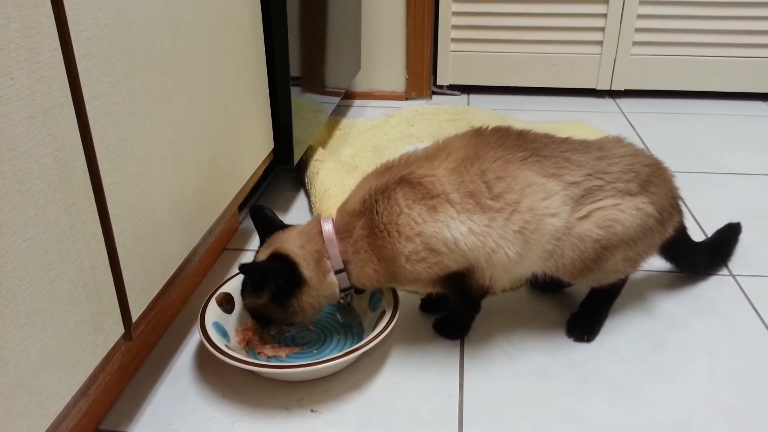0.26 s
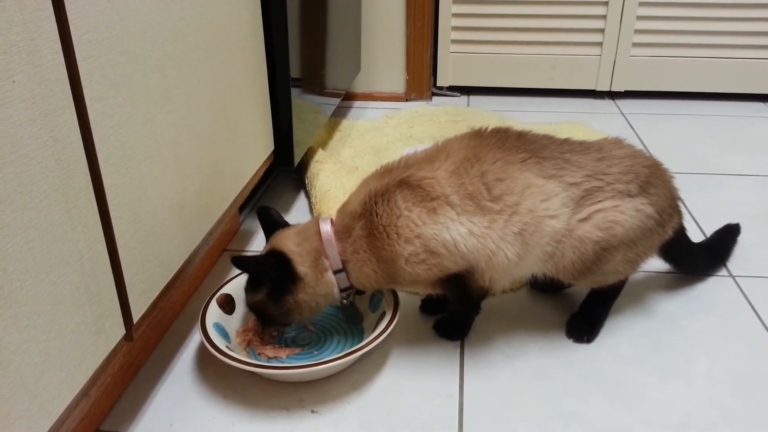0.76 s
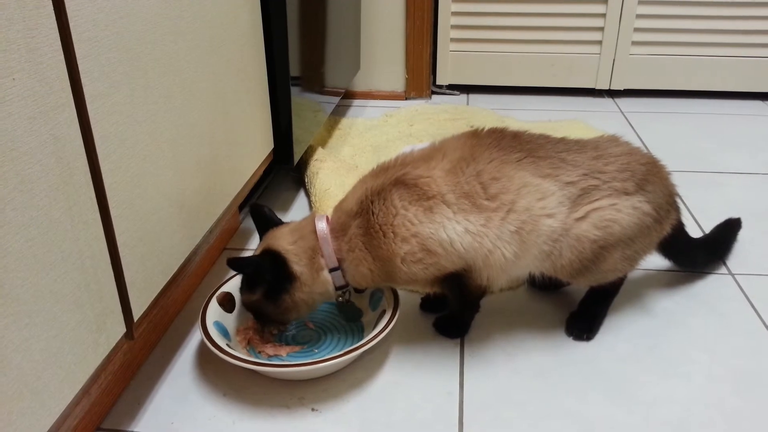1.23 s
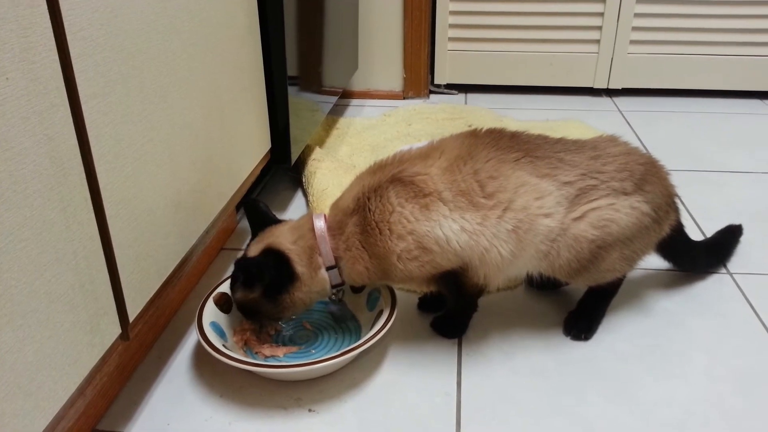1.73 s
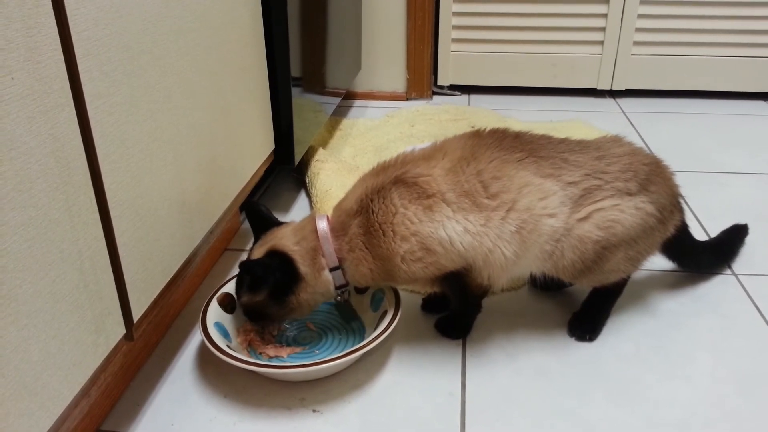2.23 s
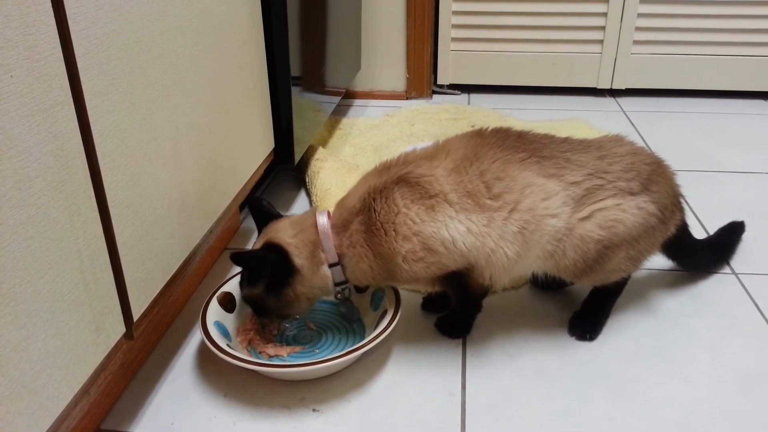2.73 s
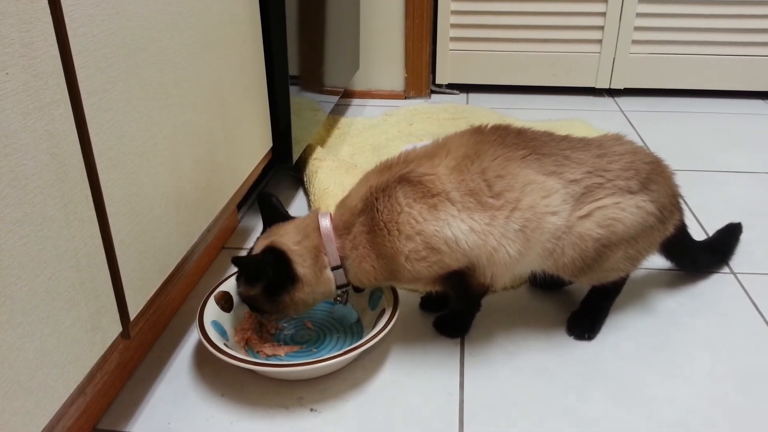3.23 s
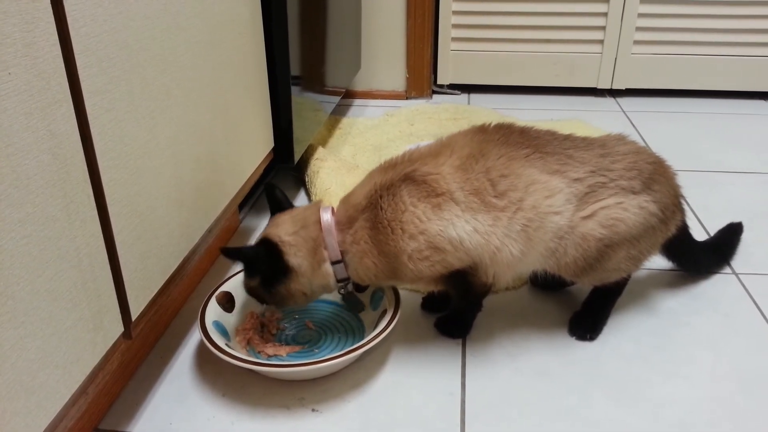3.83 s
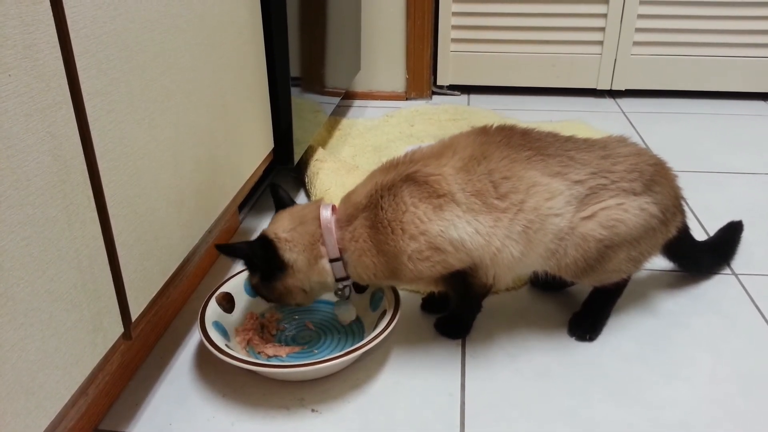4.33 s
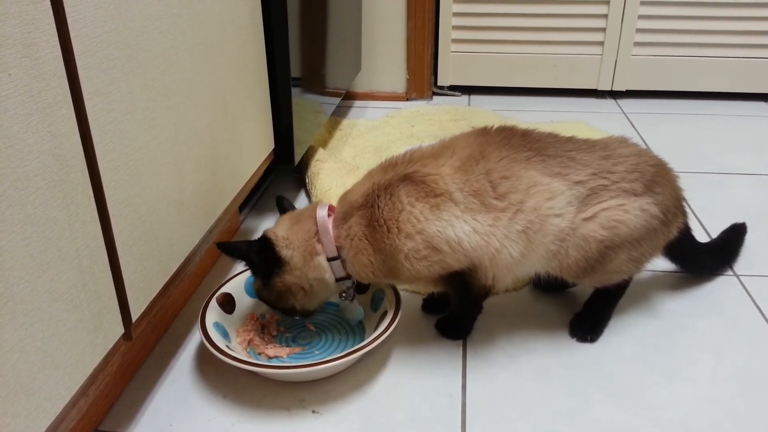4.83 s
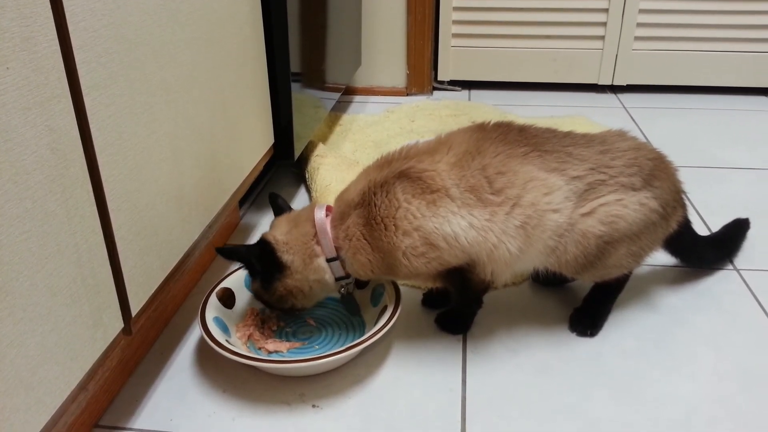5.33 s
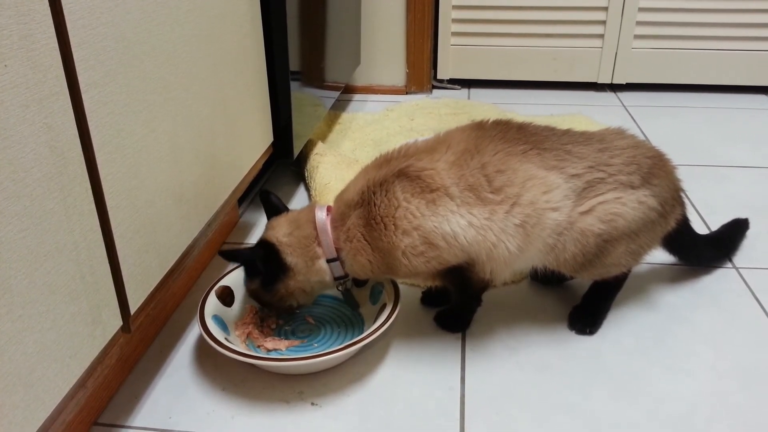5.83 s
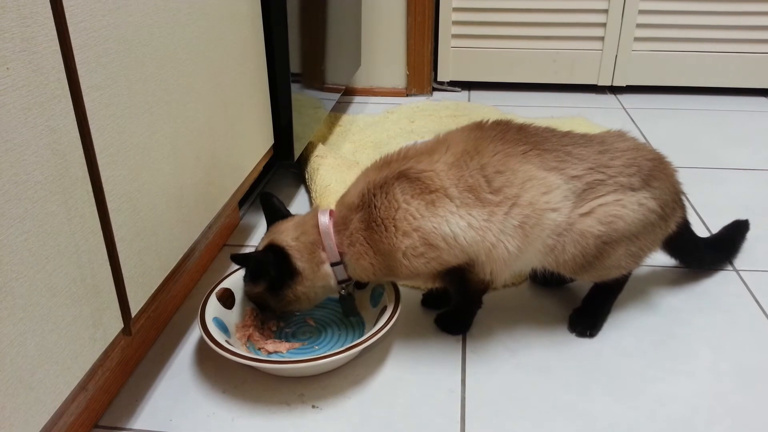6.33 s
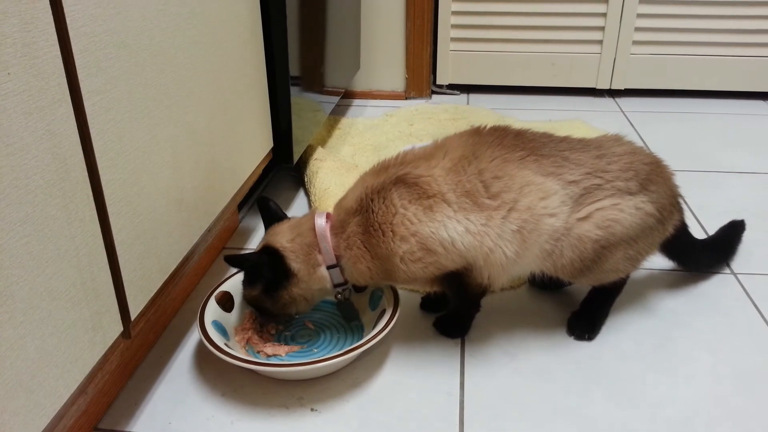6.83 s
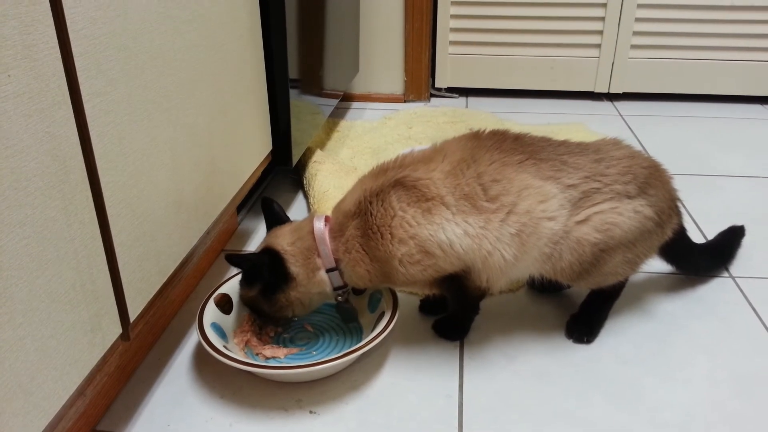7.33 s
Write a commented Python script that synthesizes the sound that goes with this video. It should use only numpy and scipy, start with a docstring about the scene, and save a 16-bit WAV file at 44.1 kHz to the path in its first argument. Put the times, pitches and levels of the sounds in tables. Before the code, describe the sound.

A cat eats wet food from a ceramic bowl on a tiled floor. Raspy licks come in quick runs, each shaking a tiny collar bell, with small wet smacks and clicks between. The metal tag now and then clinks on the rim. The busiest licking falls in the first half, then it thins to faint chewing. Close stereo microphone, small hard room, soft steady appliance hum.

```python
"""Cat eating, with a collar bell.

A cat eats wet food from a ceramic bowl on a tiled floor. Each lick jerks its head and swings a small collar
bell there and back; now and then the metal tag hits the rim. Bell, tag and bowl are sums of dying sine modes.
Tongue, wet smacks, fur and soft bumps are shaped noise; from midway, faint chewing keeps a steady beat.
Close walls add echoes and a diffuse tail, and an appliance hums as wavering sines over the room noise."""
import sys
import numpy as np
from scipy import signal
from scipy.fft import rfft, irfft
from scipy.io import wavfile

SR = 44100
rng = np.random.default_rng(int(sys.argv[2]) if len(sys.argv) > 2 else 0)


def to_wav(s):
    """Save 16-bit WAV."""
    ch = np.atleast_2d(s).T  # columns
    pcm = np.round(np.clip(ch, -1, 1) * 32767)  # PCM
    wavfile.write(sys.argv[1], SR, pcm.astype(np.int16))


N = 333396
EDGE_HZ = 14750  # upper limit of the whole sound


def gain_of(db):
    """Turns decibels into an amplitude factor."""
    return 10 ** (np.asarray(db) / 20)


def evened(x):
    """Scales x to an rms of 1."""
    return x / np.sqrt(np.mean(x ** 2) + 1e-20)


def read(points, hz):
    """Reads a table of (Hz, value) joined by lines on a log-frequency axis."""
    table_hz, value = np.transpose(points)
    return np.interp(np.log(hz + 1), np.log(table_hz), value)


def coloured(x, spectrum):
    """Filters x by a table of (Hz, dB)."""
    size = x.shape[-1]
    gain = gain_of(read(spectrum, np.fft.rfftfreq(size, 1 / SR)))
    return irfft(rfft(x) * gain, size)


def add(mix, start_s, sound):
    """Mixes a sound in at a given time, cut off at the end of the mix."""
    part = mix[max(round(start_s * SR), 0):][:len(sound)]
    part += sound[:len(part)]


def drift(rate_hz):
    """Slow random wander of rms 1: noise with nothing above rate_hz."""
    slow = np.fft.rfftfreq(N, 1 / SR) < rate_hz
    return evened(irfft(rfft(rng.standard_normal(N)) * slow, N))


# likeness of left and right in sound from all around: pitch_hz, correlation (-1..1)
LIKENESS = [(60, .94), (150, 0.99), (300, 0.71), (650, 0.51), (1300, -0.24), (3000, 0.19), (7000, 0.36)]


def diffuse(size):
    """Stereo noise from all around: nearly alike in the bass, only loosely related above."""
    left, other = rfft(rng.standard_normal((2, size)))
    same = np.clip(read(LIKENESS, np.fft.rfftfreq(size, 1 / SR)), -1, 1)
    right = same * left + np.sqrt(1 - same ** 2) * other
    return irfft(np.array([left, right]), size)


def ring(modes, tilt_db=0, detune=0, rise_s=0.00025):
    """Dying sine modes after one blow; a harder blow (higher tilt per octave) favours the high ones."""
    t = np.arange(SR // 2) / SR
    sound = np.zeros(len(t))
    for hz, db, t60 in modes:
        tilted_db = db + tilt_db * np.log2(hz / 4000)  # the tilt pivots at 4 kHz
        sound += gain_of(tilted_db - 60 * t / t60) * np.sin(2 * np.pi * hz * (1 + detune) * t)
    return sound * (1 - np.exp(-t / rise_s)) ** 2


def burst(spectrum, t60_s, rise_s=0.000088):
    """A short puff of coloured contact noise, dying by 60 dB in t60_s."""
    t = np.arange(SR // 2) / SR
    noise = evened(coloured(rng.standard_normal(len(t)), spectrum))
    return noise * gain_of(-60 * t / t60_s) * (1 - np.exp(-t / rise_s)) ** 2


# echoes off the cupboard and walls: left_s, right_s, level_db (before each source's echo_db)
ECHOES = [(.0021, 0.0023, -3), (.0137, 0.017, -4), (0.0156, .0155, 1.5), (.0225, .0212, -12.5),
          (0.0284, 0.015, -10.5)]
# time for the tail to fall by 60 dB: pitch_hz, t60_s
ROOM_T60 = [(150, 0.5), (1000, 0.29), (2500, 0.3), (6000, 0.23), (11000, 0.22), (15000, 0.091)]


def room(x, echo_db, tail_db, lag_s=.00009):
    """Direct sound (right ear first), a few wall echoes and a diffuse tail that dies soonest in the treble."""
    size = SR // 2
    hz, t, bands = signal.stft(diffuse(size), SR, nperseg=256)
    t60 = read(ROOM_T60, hz)[:, None]
    tail = signal.istft(bands * gain_of(-60 * t / t60), SR, nperseg=256)[1][:, :size]
    tail *= 1 - np.exp(-(np.arange(size) / SR / 0.0056) ** 2)  # the tail builds up over some milliseconds
    paths = gain_of(tail_db) * tail / np.linalg.norm(tail, axis=1, keepdims=True)
    direct = (0.0028, lag_s, 0.022)
    echoes = [(left, right, db + echo_db) for left, right, db in ECHOES]
    for left, right, db in [direct] + echoes:
        add(paths[0], left, gain_of([db]))
        add(paths[1], right, gain_of([db]))
    return signal.fftconvolve(x[None], paths, axes=1)[:, :N]


# colour of the swelling room noise: pitch_hz, relative level_db per Hz
RUMBLE = [(20, -28.5), (42, -18), (57, 0.5), (68, -1), (82, 1), (170, -2), (270, -6), (303, 3),
          (370, -18.5), (500, -2.5), (750, -12.5), (1300, -13.5), (2500, -24), (6000, -31)]
# colour of the even hiss: pitch_hz, relative level_db per Hz
HISS = [(500, -5), (2000, -4), (5000, -1), (11000, -3), (15000, -6)]


def background(rumble_db=-58.0, swell_db=2.9, hiss_db=-70):
    """Gently swelling room noise, nearly alike in both ears in the bass, under a thin even hiss."""
    rumble = evened(coloured(diffuse(N), RUMBLE))
    hiss = evened(coloured(rng.standard_normal((2, N)), HISS))
    return gain_of(rumble_db + swell_db * drift(rate_hz=18)) * rumble + gain_of(hiss_db) * hiss


# appliance hum: pitch_hz, mean level_db, phase between the ears_rad
HUM = [(115.3, -77, 0.5), (240.3, -73.5, -0.2), (302, -70.5, 0), (1124.4, -57.5, 3.5), (1190, -69.5, 3.5),
       (1288, -83, -2.5)]


def hum(waver_hz=1.31, flutter_db=3.0):
    """Motor tones: sines that waver slightly in pitch and level."""
    out = np.zeros((2, N))
    for hz, db, phase in HUM:
        angle = 2 * np.pi * np.cumsum(hz + waver_hz * drift(rate_hz=6)) / SR
        level = np.sqrt(2) * gain_of(db + flutter_db * drift(rate_hz=3.4))
        out += level * np.sin([angle, angle - phase])
    return out


# colour of rough wet contact: pitch_hz, relative level_db per Hz
RASP = [(100, -12), (600, 10), (1500, 3.5), (3000, -3.5), (5000, -2.5), (7000, -2), (10000, -8),
        (14000, -23)]


def licking(level_db=-4, grains_per_s=1500, spread_db=4.0):
    """The rough tongue drags through wet food: a dense crackle of random grains, swelling with each stroke."""
    sizes = gain_of(spread_db * np.minimum(rng.exponential(1, N), 4))
    present = rng.random(N) < grains_per_s / SR
    grains = sizes * rng.choice([-1, 1], N) * present
    crackle = evened(coloured(grains, RASP))
    return room(gain_of(level_db) * effort() * crackle, echo_db=-11.5, tail_db=3.0)


# licks that jerk the head: start_s, bell_db, time until the bell swings back_s
LICKS = [(0.756, -34, .053), (0.913, -25, .064), (1.053, -22.5, .057), (1.206, -26.5, .052),
         (1.353, -38, .047), (1.624, -26.5, .057), (1.746, -29.5, .062), (1.921, -36, .02),
         (2.325, -44, .02), (2.437, -43, .02), (2.596, -24.5, .061), (2.760, -16, .052), (2.898, -23, .054),
         (2.983, -29, .025), (3.110, -29, .028), (3.201, -27.5, .059), (3.952, -43.5, .061),
         (4.411, -24.5, .047), (6.042, -43.5, .086), (6.576, -48, .03), (6.763, -34.5, .031),
         (7.124, -49, .02), (7.483, -49.5, .02)]
STROKE_LEAD_S, STROKE_S = 0.0577, 0.24  # the tongue drags from just before the jerk until well after it
# crackle grows with the jerk (dB per dB of bell) and never quite stops
STROKE_DB, STROKE_GROWTH, IDLE_DB = -46, 0.58, -74.5


def effort():
    """Gain of the licking over time: one smooth swell for each stroke of the tongue."""
    power = np.full(N, gain_of(IDLE_DB) ** 2)
    swell = np.hanning(round(STROKE_S * SR))
    for s, db, _ in LICKS:
        stroke = gain_of(STROKE_DB + STROKE_GROWTH * db) * swell
        add(power, s - STROKE_LEAD_S, stroke ** 2)
    return np.sqrt(power)


# colour of the soft bumps: pitch_hz, relative level_db per Hz
BUMP = [(40, -14), (90, 1), (220, 5), (380, 1.5), (650, -2), (1200, -15.5), (3000, -24)]


def bumps(level_db=-67, per_s=7, spread_db=3, t60_s=0.1):
    """Soft low bumps, puffs of dull noise, come and go at random while the cat crouches and shifts."""
    out = np.zeros(N)
    for when, size in rng.random((round(per_s * N / SR), 2)):
        add(out, when * N / SR, gain_of(spread_db * size) * burst(BUMP, t60_s, rise_s=0.0052))
    return room(gain_of(level_db) * evened(out), echo_db=-12.5, tail_db=-4.5)


# the tag hits the rim: start_s, bowl_db, tag_db, hardness_db per octave
CLINKS = [(0.1025, -27, -29, -4), (0.3477, -37.5, -22.5, -3), (0.431, -48, -42.5, -5.5),
          (0.739, -34.5, -23.5, -5.5), (1.474, -37.5, -22.5, -2.5), (2.569, -31.5, -19.5, -5.5),
          (4.231, -17, -42, 0), (5.5182, -44, -60, -5), (5.868, -38.5, -36, -2), (6.2215, -36, -28.5, -6),
          (6.999, -41.5, -32, -8)]
# modes of the ceramic bowl: pitch_hz, relative level_db, t60_s
BOWL = [(1008, -25, .38), (2304, -10, .16), (2335, -22, .1), (4052, -4, .045), (4070, -6, .08),
        (6154, -3, .14), (6330, -6, .08), (7930, -16, .15), (8090, -22, .14), (8272, -8, .13),
        (8517, -8, .13), (9451, -9, .14), (10200, -17, .12), (10835, 2, .075), (11190, -20, .13),
        (12490, -26, .09)]
# modes of the metal tag: pitch_hz, relative level_db, t60_s
TAG = [(3964, -20, .07), (6457, -5, .07), (6515, -1, .055), (7560, -18, .12), (8637, -19, .1),
       (10200, -28, .07), (10390, -27, .07), (10863, -27, .05)]
# colour of the dull knock: pitch_hz, relative level_db per Hz
KNOCK = [(40, -14.5), (80, -4), (230, 2), (380, -2), (550, 1), (850, 3.5), (1500, -6.5), (3000, -10.5),
         (5000, -4), (7000, 4), (11000, -17.5), (12500, -22)]
KNOCK_DB, KNOCK_GROWTH = -21.5, 0.49  # the knock of a clink, and its dB per dB of ring


def clinks():
    """Bowl and tag ring together; the tag hangs under the chin, so its echoes outweigh its direct sound."""
    bowl, tag, knock = np.zeros((3, N))
    for s, bowl_db, tag_db, hardness_db in CLINKS:
        ring_db = 20 * np.log10(np.hypot(gain_of(bowl_db), gain_of(tag_db)))
        knock_gain = gain_of(KNOCK_DB + KNOCK_GROWTH * ring_db)
        tag_detune = 0.0005 * rng.standard_normal()
        add(bowl, s, gain_of(bowl_db) * ring(BOWL, hardness_db))
        add(tag, s, gain_of(tag_db) * ring(TAG, detune=tag_detune, rise_s=0.0015))
        add(knock, s, knock_gain * burst(KNOCK, t60_s=0.032, rise_s=0.00049))
    shaded_tag = room(tag, echo_db=4.5, tail_db=2)
    return room(bowl, echo_db=-10.0, tail_db=-5.5) + shaded_tag + room(knock, echo_db=-1, tail_db=4.5)


# modes of the bell shell: pitch_hz, relative level_db, t60_s (pitch and level vary at each strike)
BELL = [(5796, -15, 0.059), (5780, -5.5, 0.012), (5788, -1.5, 0.014), (6150, -17, 0.014),
        (10930, -22, 0.026), (13650, -23.5, 0.029), (13900, -25.5, .02)]


def bell(bounce_db=-8, bounce_gap_s=0.014, tick_db=-18, count=4):
    """The pellet strikes the slotted shell and bounces, ever softer; each spot rings the modes differently."""
    out = np.zeros(N)
    for s, db in jingles():
        gaps = rng.uniform(0.36, 1.8, count)
        spots = rng.standard_normal((count, len(BELL) + 1))
        times = s + bounce_gap_s * (np.cumsum(gaps) - gaps[0])
        for k, (detune, *shares) in enumerate(spots):
            modes = [(hz, level + 3.3 * share, t60) for (hz, level, t60), share in zip(BELL, shares)]
            tone = ring(modes, detune=0.0087 * detune, rise_s=0.00028)
            tick = gain_of(tick_db) * burst(RASP, t60_s=0.0047)
            add(out, times[k], gain_of(db + k * bounce_db) * (tone + tick))
    return room(out, echo_db=-8.0, tail_db=-4.0)


BACK_DB, BACK_GROWTH = 1.5, 0.1  # the back swing against the first strike: weaker after a gentle lick
JOLT_DB = -9  # a clink also jolts the bell, this far from the tag's level


def jingles():
    """Strikes of the bell as (start_s, level_db): there and back for each lick, once for each clink."""
    there = [(s, db) for s, db, swing in LICKS]
    back = [(s + swing, db + BACK_DB + BACK_GROWTH * db) for s, db, swing in LICKS]
    jolts = [(s, tag_db + JOLT_DB) for s, _, tag_db, _ in CLINKS]
    return there + back + jolts


# colour of the collar in the fur: pitch_hz, relative level_db per Hz
RUSTLE = [(45, -12), (100, 9), (500, 5), (1000, 2), (2000, 1.5), (4000, -3.5), (7000, 1), (10000, -1.5),
          (14000, -5.5)]


def rustle(level_db=-47, growth=0.46):
    """Each jerk that shakes the bell also drags the collar through the fur: a puff of noise."""
    out = np.zeros(N)
    for s, db in jingles():
        add(out, s, gain_of(level_db + growth * db) * burst(RUSTLE, t60_s=.3))
    return room(out, echo_db=-1.5, tail_db=1.5)


# the clear wet smacks: start_s, level_db, mouth resonance pitch_hz, width (share of the pitch), t60_s
SMACKS = [(0.599, -53, 4600, 0.44, .03), (0.722, -40.5, 2900, 0.29, 0.064),
          (2.135, -21, 6500, 0.18, 0.0033), (2.2214, -26, 7500, 0.48, 0.0038),
          (2.533, -48.5, 2450, 0.75, 0.28), (2.985, -26.5, 9900, 0.29, 0.0088),
          (3.24, -29, 9500, 0.48, 0.013), (3.388, -51, 1000, 0.17, 0.031), (3.457, -45, 1300, 0.38, 0.018),
          (3.482, -45.5, 1370, 0.4, 0.01), (3.615, -18, 9000, 0.52, 0.0033), (4.024, -35, 4200, 1.4, 0.024),
          (4.097, -35.5, 2970, 1.5, .016), (5.012, -46.5, 6000, 0.52, 0.037), (6.13, -41, 4500, 0.55, .015),
          (6.35, -36.5, 10000, 0.18, 0.013), (6.649, -32, 6550, 0.4, 0.0059),
          (6.717, -32.5, 5000, 0.069, 0.012), (7.385, -43, 7170, 0.38, 0.017)]


def smacks(spray_db=-30):
    """A film of saliva snaps, the mouth rings briefly with it, and a fine spray follows."""
    out = np.zeros(N)
    for s, db, hz, width, t60 in SMACKS + chews() + saliva():
        low_hz, high_hz = hz / (1 + width), min(hz * (1 + width), SR / 2 - 1)
        mouth = signal.butter(2, [low_hz, high_hz], "band", fs=SR, output="sos")
        narrow_boost = np.sqrt(EDGE_HZ / (high_hz - low_hz))  # makes up for what a narrow band loses
        pop = signal.sosfilt(mouth, burst(RASP, t60)) * narrow_boost
        spray = gain_of(spray_db) * burst(RASP, t60_s=0.091)
        add(out, s, gain_of(db) * (pop + spray))
    return room(out, echo_db=-14.0, tail_db=-6.5)


def saliva(level_db=-45, uneven_db=3, centre_hz=6500, octaves=.3, width=0.38, t60_s=.008):
    """A tiny bubble of saliva snaps at some moment of each tongue stroke, as rows like the smacks."""
    rows = []
    draws = rng.uniform(-1, 1, (len(LICKS), 3))
    for (s, _, _), (late, size, pitch) in zip(LICKS, draws):
        snap_s = s + STROKE_S / 2 * abs(late)
        rows.append((snap_s, level_db + uneven_db * size, centre_hz * 2 ** (octaves * pitch), width, t60_s))
    return rows


CHEW_FROM_S, CHEW_EVERY_S = 3.70, .331
CHEW_DB, CHEW_HZ, CHEW_WIDTH, CHEW_T60_S = -69, 3990, 0.28, 0.29  # mean level and mouth resonance of a bite


def chews():
    """One faint squelch for each bite, a little uneven in strength, as rows like the smacks."""
    times = np.arange(CHEW_FROM_S, N / SR, CHEW_EVERY_S)
    return [(s, CHEW_DB + 2 * rng.standard_normal(), CHEW_HZ, CHEW_WIDTH, CHEW_T60_S) for s in times]


def scene():
    """All layers together, in stereo."""
    return clinks() + bell() + rustle() + smacks() + licking() + bumps() + background() + hum()


# tone balance of left against right, shared half and half: pitch_hz, left minus right_db
BALANCE = [(100, 0), (300, .5), (600, 4), (1000, 4), (1120, -2), (1500, 3), (2800, 0), (4100, 6), (5000, 3),
           (5800, -1.5), (6500, -8), (8600, -8), (9500, -3), (10800, -6), (14000, -1)]


def record(dry):
    """Leans each band towards the left or right, then cuts everything above the upper limit."""
    lean_db = read(BALANCE, np.fft.rfftfreq(N, 1 / SR)) / 2
    ports = irfft(rfft(dry) * gain_of([lean_db, -lean_db]), N)
    low_pass = signal.firwin(255, EDGE_HZ, window=("kaiser", 8), fs=SR)
    return signal.oaconvolve(ports, low_pass[None], "same")


dry = scene()
out = record(dry)
to_wav(out)
```